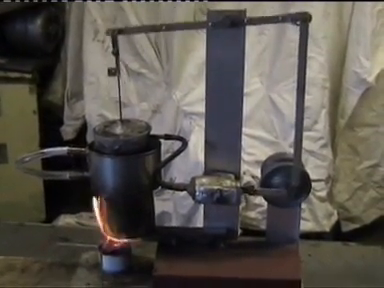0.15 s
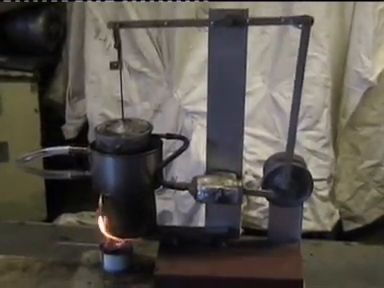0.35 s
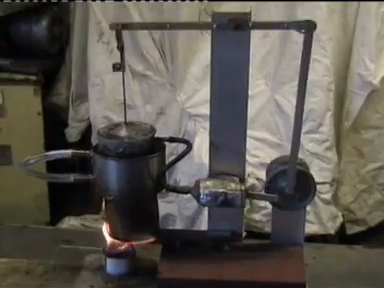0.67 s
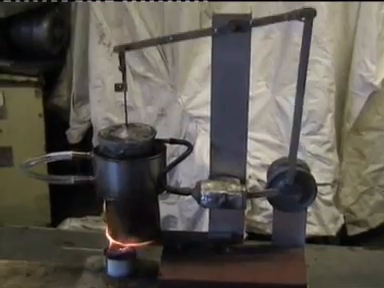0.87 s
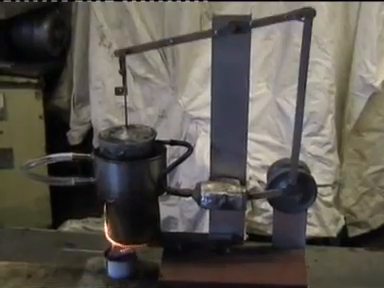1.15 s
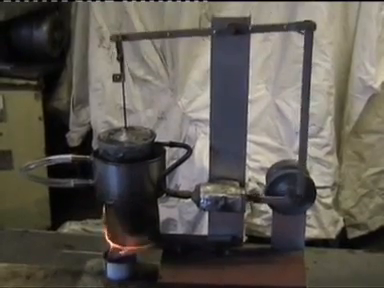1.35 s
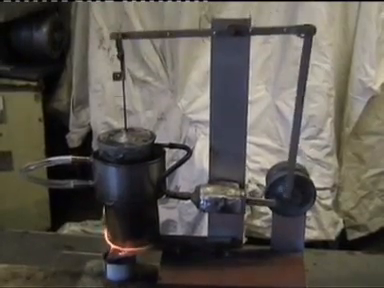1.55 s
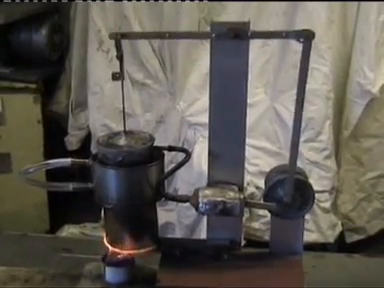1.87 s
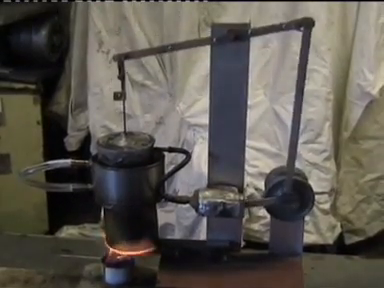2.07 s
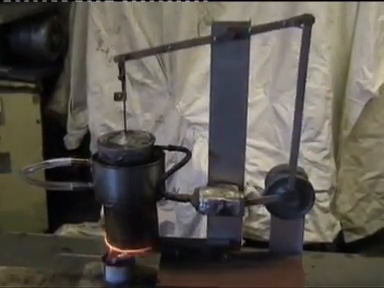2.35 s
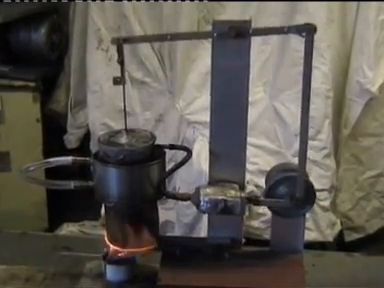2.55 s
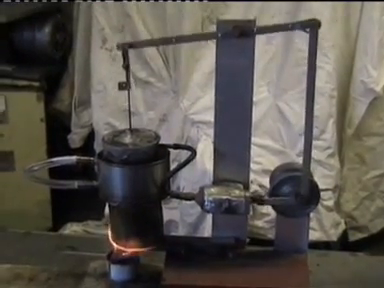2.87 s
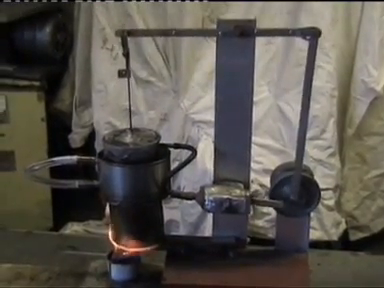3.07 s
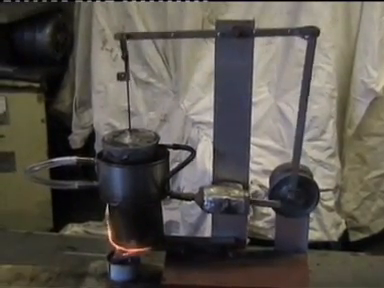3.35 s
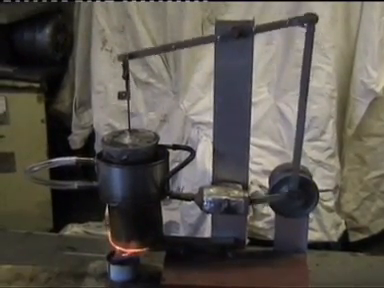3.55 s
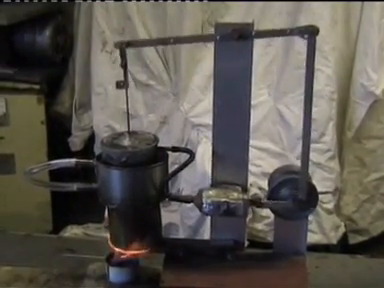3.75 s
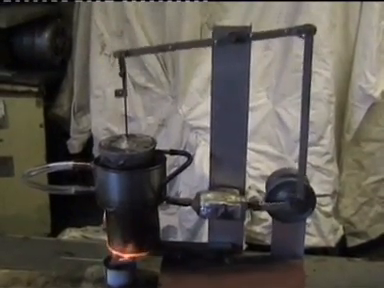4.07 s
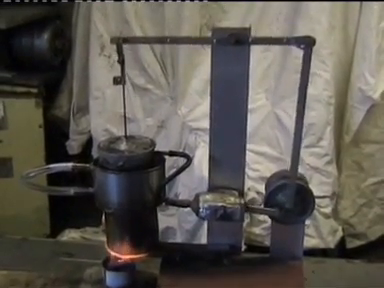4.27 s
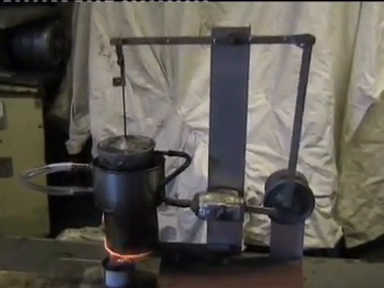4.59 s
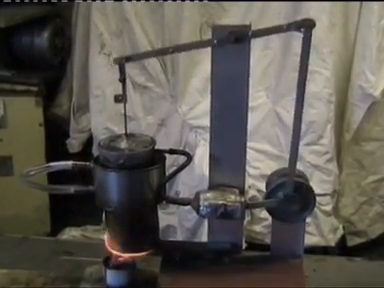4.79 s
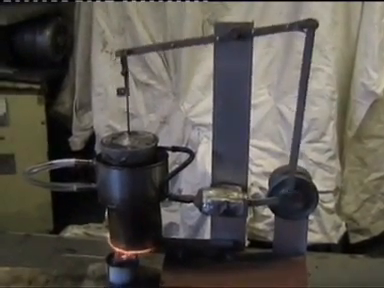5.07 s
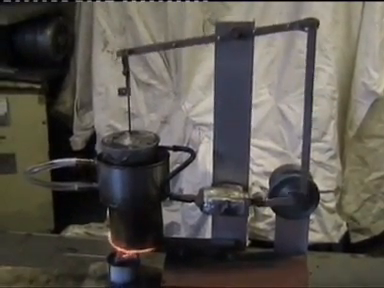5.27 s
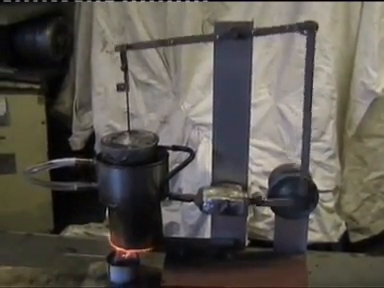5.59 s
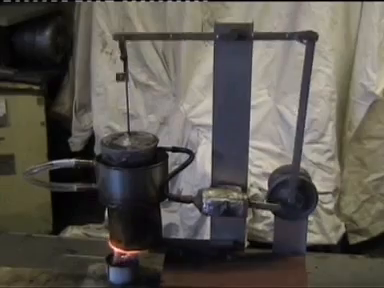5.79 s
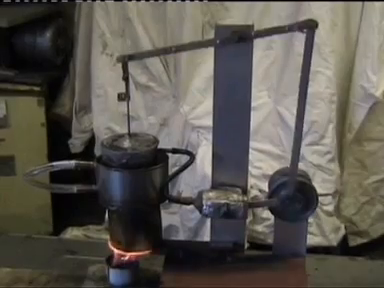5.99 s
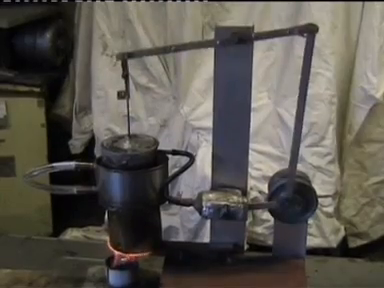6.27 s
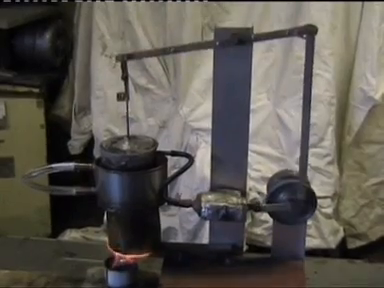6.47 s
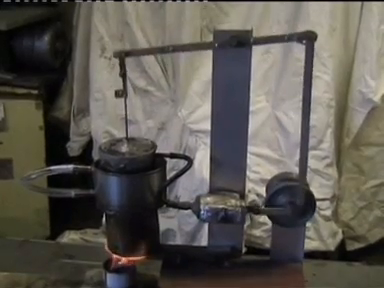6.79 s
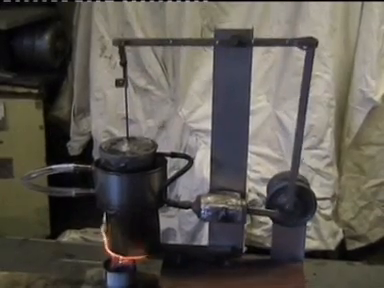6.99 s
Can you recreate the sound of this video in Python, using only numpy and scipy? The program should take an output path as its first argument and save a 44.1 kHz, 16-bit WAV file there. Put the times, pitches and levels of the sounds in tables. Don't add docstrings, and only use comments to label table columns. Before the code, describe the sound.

Rapid, regular tinny clacking from a little bench engine, each turn a knock, a double tap and a soft brush, with dry ticks.

```python
import sys
import numpy as np
from scipy import signal
from scipy.fft import rfft, irfft, next_fast_len
from scipy.io import wavfile
from scipy.ndimage import uniform_filter1d

SR = 44100
rng = np.random.default_rng(int(sys.argv[2]) if len(sys.argv) > 2 else 0)


def master_out(mix):
    frames = np.transpose(np.atleast_2d(mix))
    ceiling = np.clip(frames, -1, 1)
    pcm = np.round(ceiling * 32767).astype(np.int16)
    wavfile.write(sys.argv[1], SR, pcm)


def voltage_ratio(decibels):
    exponent = np.asarray(decibels, float) / 20
    return 10 ** exponent


N = 314433

# (t/s, blow level/dB, sharp edge level/dB)
KNOCKS = [(-0.03, -32, -45), (0.2695, -36, -49.5), (0.5716, -37.5, -51.5), (0.8735, -35.5, -49.5),
          (1.1729, -34.5, -50.5), (1.4764, -36, -50), (1.7752, -37, -52), (2.0751, -36, -50.5),
          (2.3751, -34, -48.5), (2.6743, -34.5, -50), (2.9726, -33.5, -51), (3.275, -36, -51),
          (3.5736, -34, -50), (3.8696, -35.5, -50), (4.1674, -37.5, -49.5), (4.468, -36, -50.5),
          (4.7639, -34.5, -50.5), (5.06, -34.5, -48), (5.358, -36.5, -51), (5.657, -36, -50),
          (5.955, -36, -50), (6.2566, -39.0, -51), (6.559, -38, -50), (6.8605, -35.5, -52)]


def coloured(points, db):
    hz, shape = np.transpose(points)
    f = np.maximum(np.arange(N // 2 + 1) * SR / N, 1)
    gain = voltage_ratio(np.interp(np.log(f), np.log(hz), shape))
    x = irfft(rfft(rng.standard_normal(N)) * gain, N)
    return x * voltage_ratio(db) / x.std()


def walk(rate):
    k = int(SR / rate)
    held = np.repeat(rng.standard_normal(N // k + 1), k)
    return 1.83 * uniform_filter1d(uniform_filter1d(held, k), k)[:N]


def ring(x, hz, t60):
    r = 1000 ** (-1 / (t60 * SR))
    w = 2 * np.pi * hz / SR
    return signal.lfilter([0, r * np.sin(w)], [1, -2 * r * np.cos(w), r * r], x)


def drone(hz, t60):
    hum = ring(rng.standard_normal(N), hz, t60)
    return hum / hum.std()


def strikes(s, size):
    i = np.round(s * SR).astype(int)
    inside = (i >= 0) * (i < N)
    return np.bincount(np.clip(i, 0, N - 1), size * inside, N)


def bursts(s, db, t60, lo_hz, hi_hz):
    fade = signal.lfilter([1], [1, -1000 ** (-1 / (t60 * SR))], strikes(s, voltage_ratio(db)))
    band = signal.butter(2, [lo_hz, hi_hz], "band", fs=SR, output="sos")
    return signal.sosfilt(band, fade * rng.standard_normal(N))


def chatter(x, t60):
    r = 1000 ** (-1 / (t60 * SR))
    return signal.lfilter([np.sqrt(1 - r * r)], [1, -r], x) * rng.standard_normal(N)


def echo(x, t60, db):
    t = np.arange(SR // 2) / SR
    dull = signal.lfilter([1], [1, -.6], rng.standard_normal(len(t)))
    tail = dull * 1000 ** (-t / t60) * (t > .006)
    return signal.fftconvolve(x, tail * voltage_ratio(db) / np.linalg.norm(tail))[:N]


def idle_input():
    # (f/Hz, level/dB per Hz)
    idle_colour = [(30, 3.5), (110, 5), (200, -10), (450, -13), (1000, -22), (3000, -25), (10800, -24),
                   (11300, -44.5)]
    return coloured(idle_colour, -78)


def room():
    # (f/Hz, level/dB per Hz)
    room_colour = [(35, -28), (50, -11.5), (85, -8), (150, -2), (260, -3.5), (500, 3), (800, -5),
                   (1100, -6), (1800, -17.5), (3000, -21.5), (5500, -27.5), (6800, -29), (7600, -43),
                   (11000, -35)]
    return coloured(room_colour, -56) * voltage_ratio(walk(9))


def bench():
    # (t/s, level/dB)
    swell = [(0.0, -71), (0.14, -45), (0.24, -74), (1.33, -56.5), (1.37, -80.5), (4.49, -56), (4.65, -52.5),
             (4.75, -66), (5.58, -72), (5.82, -56), (7.13, -64)]
    # (f/Hz, t60/s, level/dB)
    hollows = [(67, 0.33, -72.5), (128.6, 0.28, -69), (199.5, 0.2, -68), (228.6, 0.18, -66.5),
               (263, 0.16, -68), (389.7, 0.46, -70), (459.6, 0.47, -75)]
    s, db = np.transpose(swell)
    top = drone(150.4, 0.87) * voltage_ratio(np.interp(np.arange(N) / SR, s, db) - 1.5)
    return top + sum(voltage_ratio(level_db) * drone(hz, t60) for hz, t60, level_db in hollows)


def nicks():
    # (t/s, level/dB, pitch f/Hz)
    rod_nicks = [(.348, -58, 2783), (.6505, -50.5, 2783), (.7037, -62, 2920), (1.254, -59, 2783),
                 (1.402, -59, 2783), (1.553, -59, 2783), (2.155, -56, 2783), (2.544, -67, 1900),
                 (2.598, -63, 3020), (3.152, -65, 2200), (4.744, -68, 2230), (4.878, -52, 3140),
                 (4.924, -61, 2220), (5.783, -49, 3090), (5.873, -62, 2080), (6.824, -58, 2080),
                 (6.98, -52, 3100), (7.093, -49.5, 1098)]
    return sum(ring(strikes(np.array([s]), voltage_ratio(np.array([db]))), hz, 150 / hz) for s, db, hz in rod_nicks)


def pivots():
    # (t/s, level/dB)
    pin_ticks = [(0.0482, -50), (.3502, -52), (0.6518, -44), (0.9584, -57), (1.2545, -55), (1.561, -54),
                 (1.853, -50.5), (2.1375, -41), (2.4546, -53.5), (2.752, -50.5), (3.0521, -56),
                 (3.6527, -51.5), (3.95, -49), (4.248, -53), (4.838, -58), (5.136, -55), (5.4351, -48),
                 (5.736, -46), (6.056, -56), (6.3357, -43.5), (6.638, -48), (6.9398, -49.5)]
    # (t/s, level/dB)
    stray_ticks = [(0.168, -58), (.2165, -59), (.5435, -58), (0.704, -57), (1.679, -61), (2.115, -57),
                   (2.2555, -54), (2.5793, -56), (2.6, -59), (2.8555, -58), (3.158, -56.5), (3.2611, -66),
                   (3.638, -55), (3.693, -57.5), (3.7052, -55), (3.7826, -54), (4.2185, -59), (4.3135, -57),
                   (4.347, -49.5), (4.5783, -62), (5.0402, -55), (5.4176, -60), (5.773, -59), (5.8466, -57),
                   (5.9385, -51), (6.2035, -60), (6.506, -62), (6.649, -62), (6.797, -56.5)]
    faint_s = rng.random(size=30) * N / SR
    faint_db = -63.5 + 3.5 * rng.standard_normal(size=30)
    faint = np.array([faint_s, faint_db])
    s, db = np.concatenate([np.transpose(pin_ticks), np.transpose(stray_ticks), faint], axis=1)

    crack = bursts(s, db + 3, 0.007, 2500, 8000)
    body = bursts(s, db + 5.5, 0.0099, 800, 2600)
    air = bursts(s, db + 6, .008, 8500, 11500)
    fizz = bursts(s, db - 7.5, 0.14, 4230, 6500)
    when, rarity = rng.random((250, 2)).T
    scrape = bursts(when * N / SR, -60 - 2.6 * np.log(rarity), 0.016, 1500, 3800)
    return crack + fizz + body + air + scrape


def touches():
    # (t/s, blow level/dB, sharp edge level/dB, level of the graze before it/dB)
    near_slaps = [(.062, -36.5, -55, -40), (.362, -38, -60, -40.5), (.664, -36, -50, -41),
                  (.963, -37, -53, -39.5), (1.269, -44.5, -58, -42), (1.566, -41, -54, -44),
                  (1.862, -36.5, -51, -41.5), (2.17, -36.5, -51.5, -42.5), (2.463, -34.5, -53.5, -40),
                  (2.772, -36, -56, -39), (3.059, -41, -53, -44.5), (3.371, -38, -62, -40),
                  (3.661, -42, -52.5, -41), (3.968, -38.5, -60, -40), (4.248, -35, -48.5, -46),
                  (4.549, -34, -53, -40), (4.866, -41, -52, -39), (5.15, -34.5, -51.5, -42),
                  (5.448, -38, -61, -39), (5.756, -37.5, -52, -39), (6.059, -39, -55.5, -41.5),
                  (6.353, -39, -52, -40.5), (6.652, -36.5, -53, -40.5), (6.946, -38, -55, -40)]
    # (t/s, blow level/dB, sharp edge level/dB)
    far_slaps = [(.092, -39, -53), (.392, -44.5, -70), (.693, -45, -58), (.981, -36, -50.5),
                 (1.286, -52, -67), (1.601, -41, -66), (1.904, -38, -50.5), (2.186, -41.5, -51.5),
                 (2.502, -41.5, -53), (2.8, -38.5, -66), (3.095, -41, -67), (3.398, -37.5, -69),
                 (3.693, -34.5, -50), (3.985, -38.5, -61), (4.29, -35, -46.5), (4.586, -31, -45),
                 (4.884, -38.5, -48.5), (5.192, -40, -54), (5.478, -36.5, -64), (5.782, -38.5, -49.5),
                 (6.077, -40, -64), (6.375, -40.5, -63), (6.685, -38, -52), (6.98, -34.5, -50)]
    # (delay t/s, blow level/dB, sharp edge level/dB)
    settling = [
        (.013, -49.5, -65),
        (.029, -47, -62.5),
        (.05, -61.5, -70.5),
    ]
    # (t/s after the knock, blow level/dB, sharp edge level/dB)
    brushes = [
        (.226, -49.5, -65),
        (.237, -48.5, -77.5),
        (.262, -60.5, -62.5),
    ]
    knock_s = np.transpose(KNOCKS)[0]
    near, far = np.transpose(near_slaps), np.transpose(far_slaps)
    graze_s, graze_db = knock_s + .073, near[3]
    every_turn = np.zeros(len(knock_s))

    too_quick = far[0] - near[0] < 0.018
    crossing = np.minimum(near[1], far[1]) - 3.5 - 40 * too_quick
    light = [((near[0] + far[0]) / 2, crossing, crossing - 18)]
    for start, group in ((far[0], settling), (knock_s, brushes)):
        light += [(start + s, db + every_turn, edge_db + every_turn) for s, db, edge_db in group]
    patter = (near[1] + far[1] + graze_db) / 3 - 9
    for part in np.linspace(-.1, 1.1, num=6):
        light.append((graze_s + part * (far[0] - graze_s), patter, patter - 21))
    light = np.concatenate(light, axis=1)

    scatter = np.array([[0.00246], [1.6], [5]])
    light = light + rng.standard_normal(light.T.shape).T * scatter
    graze = [graze_s, graze_db, graze_db - 15]
    return np.concatenate([graze, near[:3], far, light], axis=1)


def engine():
    # (f/Hz, t60/s, polarity, level under a knock/dB)
    can_modes = [(147, .25, -1, -17), (264, .25, 1, -24), (387, .2, -1, -30), (452, .25, 1, -25),
                 (557, .17, 1, -16), (607, .062, -1, -5), (673, .157, -1, -5), (719, .093, 1, 0),
                 (756, .197, 1, -16), (811, .25, 1, -13.5), (852, .159, -1, -12.5), (1030, .08, 1, -28),
                 (1061, .012, -1, -9)]
    # (level under the rattle/dB, level under the brush/dB)
    touch_colour = [(-18.5, -20.5), (-21, -27), (-25, -12), (-22.5, -28), (-7, -2.5), (-3.5, -0.5),
                    (-7, -9.5), (-1, -3), (-20.5, -20.5), (-14.5, -26), (-11, -17.5), (-12, -16),
                    (-7.5, -9)]
    # (f/Hz, t60/s, level under a knock/dB, level under a tap/dB)
    rod_modes = [(1386, 0.045, 8.5, 0), (1634, 0.032, -3, -7), (1654, 0.074, 2.5, -8.5),
                 (1900, 0.11, -3, -8), (1990, 0.15, -1.5, -9.5), (2195, 0.035, -10.5, -18.5),
                 (2540, 0.047, -13.5, -18.5), (2783, 0.055, -1, -10), (3110, 0.021, 5.5, -9),
                 (3200, 0.03, -18, -7), (3610, 0.084, -10.5, -24), (4070, 0.06, -20, -29),
                 (4900, 0.12, -31, -24), (5100, 0.07, -25, -26.5), (5430, 0.04, -7.5, -23.5),
                 (5570, 0.061, -11, -21.5), (5810, 0.051, -12, -19), (6200, 0.023, -31, -19),
                 (7260, 0.025, -34, -42), (7066, 0.1, -19.5, -33)]
    knock_s, knock_db, knock_edge = np.transpose(KNOCKS)
    tap_s, tap_db, tap_edge = touches()
    last = knock_s[np.searchsorted(knock_s, tap_s) - 1]
    brushing = (tap_s - last) % np.diff(knock_s).mean() > .2
    spot = rng.standard_normal((len(tap_s), 40))
    wobble = rng.standard_normal((len(knock_s), 40))
    side = np.sign(spot[:, -1])
    rebound_s = knock_s + .0324

    def knocks(db):
        return strikes(knock_s, voltage_ratio(db)) + strikes(rebound_s, .22 * voltage_ratio(db))

    can = rods = 0
    for k, ((hz, t60, sign, on_knock), (on_rattle, on_brush)) in enumerate(zip(can_modes, touch_colour)):
        colour = np.where(brushing, on_brush, on_rattle) + 1.5 * spot[:, k]
        taps = strikes(tap_s, side * voltage_ratio(tap_db + colour))
        blows = knocks(knock_db + on_knock + .6 * wobble[:, k])
        can = can + sign * ring(blows + taps, hz, t60)
    for k, (hz, t60, on_knock, on_tap) in enumerate(rod_modes, len(can_modes)):
        taps = chatter(strikes(tap_s, voltage_ratio(tap_edge + on_tap - 3 + 2.5 * spot[:, k])), .03)
        blows = knocks(knock_edge + on_knock - 7 + 1.5 * wobble[:, k])
        rods = rods + (-1) ** k * ring(blows + taps, hz, t60)

    rods = rods + bursts(knock_s, knock_edge + 5, 0.13, 1200, 2480)
    rods = rods + bursts(knock_s, knock_edge + 3, 0.02, 3200, 3270)
    rods = rods + bursts(knock_s, knock_edge - 4, 0.083, 4850, 8500)
    rods = rods + bursts(knock_s, knock_edge + 8, .02, 8300, 11500)
    rods = rods + bursts(rebound_s, knock_edge - 6, 0.013, 1200, 6500)
    return can, rods + bursts(tap_s, tap_edge + 4, 0.04, 1200, 3200)


def scene():
    can, rods = engine()
    bright = rods + pivots() + nicks()
    wet = echo(bright, .18, -13)
    left = can + bright + wet + bench() + room()
    return np.array([left, idle_input() + voltage_ratio(-67) * left])


def whine():
    t = np.arange(N) / SR
    return voltage_ratio(-86) * np.sin(2 * np.pi * 4199 * t) + voltage_ratio(-85) * np.sin(2 * np.pi * 4499 * t)


def band_limit(x):
    return signal.sosfilt(signal.butter(12, 11700, fs=SR, output="sos"), x)


def record(dry):
    offsets = [
        [.00838],
        [.01679],
    ]
    whine_hz = 298.9
    left = signal.sosfilt(signal.cheby2(6, 22, 7900, fs=SR, output="sos"), dry[0])
    size = next_fast_len(N + SR)
    turn = np.exp(-2j * np.pi * np.arange(size // 2 + 1) * SR / size / whine_hz)
    left = irfft(rfft(left, size) * (1 - .98 * turn) / (1 - .78 * turn), size)[:N]
    left = left + whine() + voltage_ratio(-81.5) * rng.standard_normal(N)
    return band_limit(np.array([left, dry[1]]) + offsets)


dry = scene()
out = record(dry)
master_out(out)
```